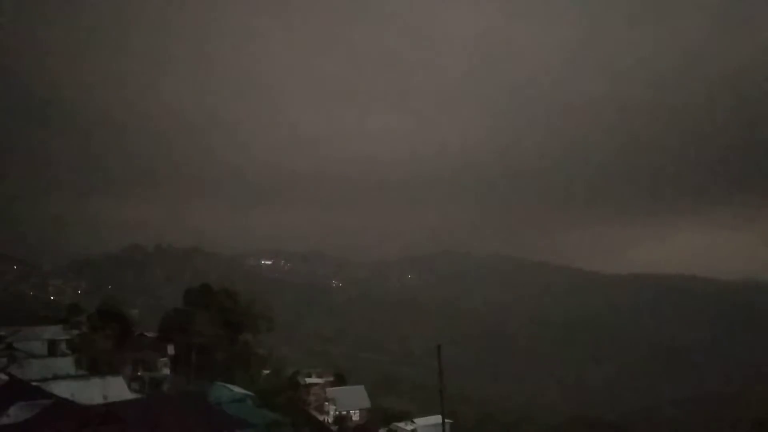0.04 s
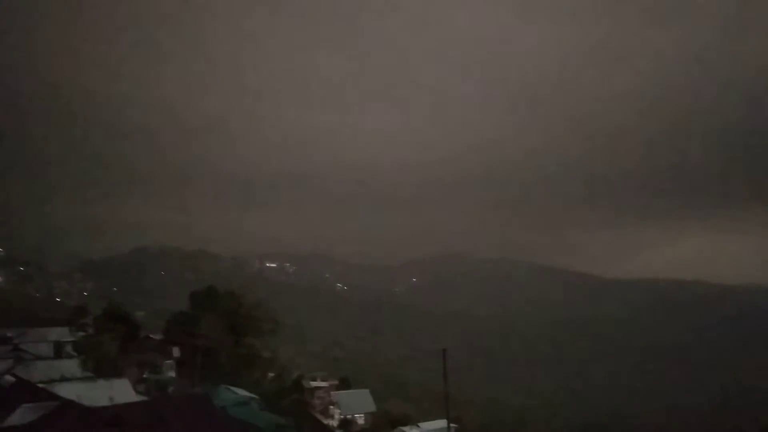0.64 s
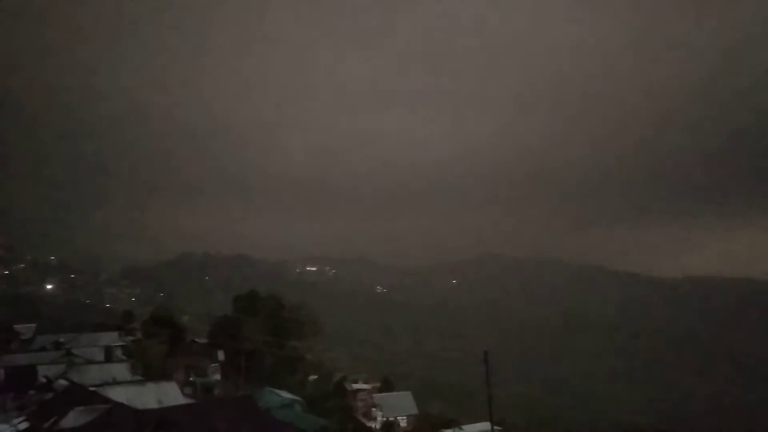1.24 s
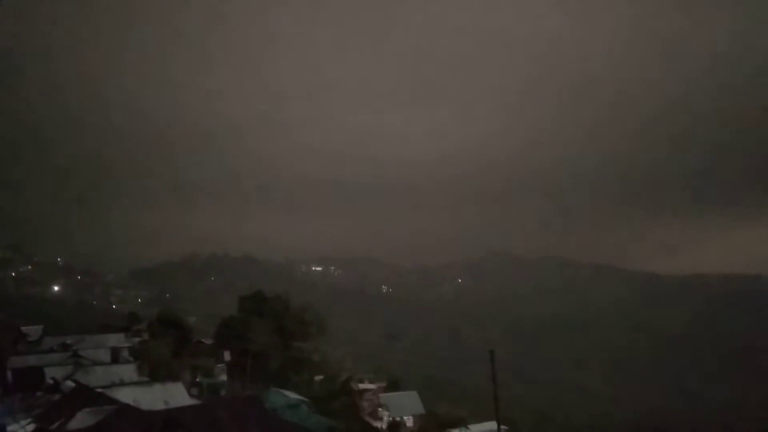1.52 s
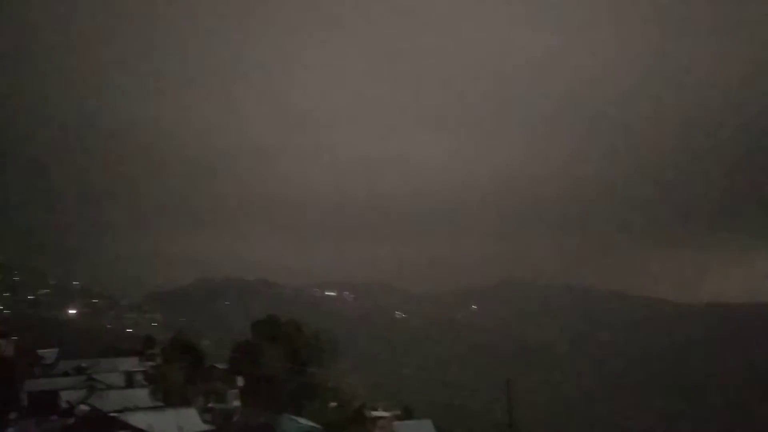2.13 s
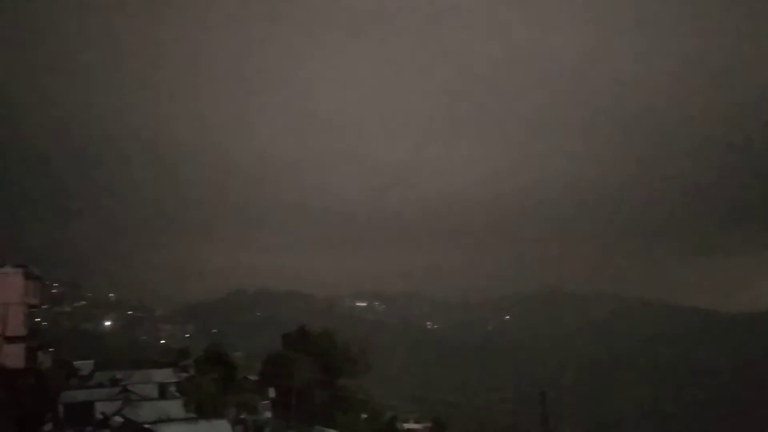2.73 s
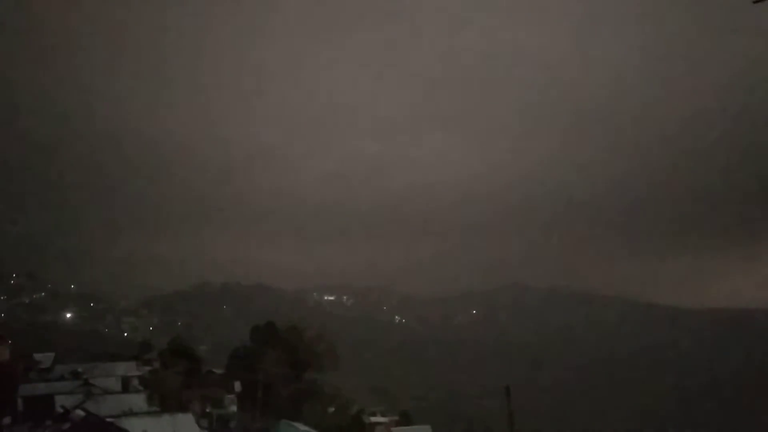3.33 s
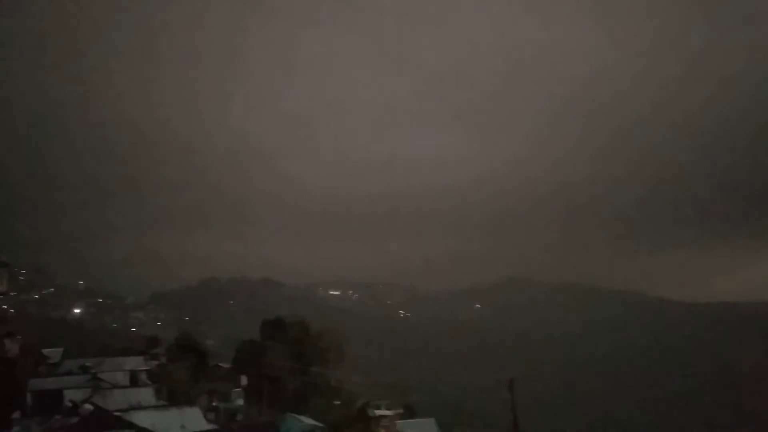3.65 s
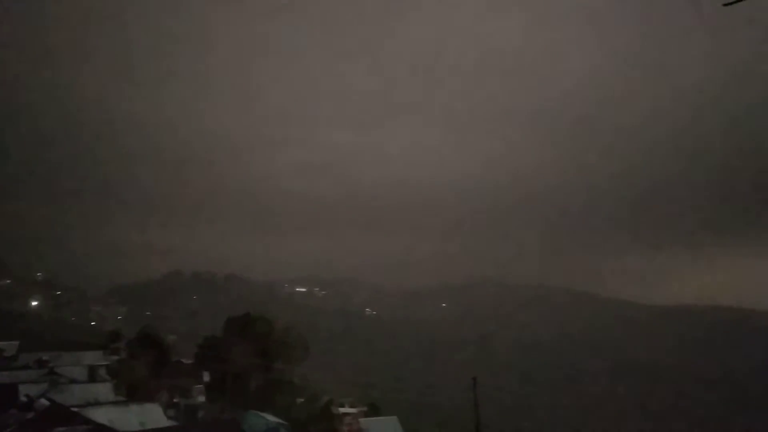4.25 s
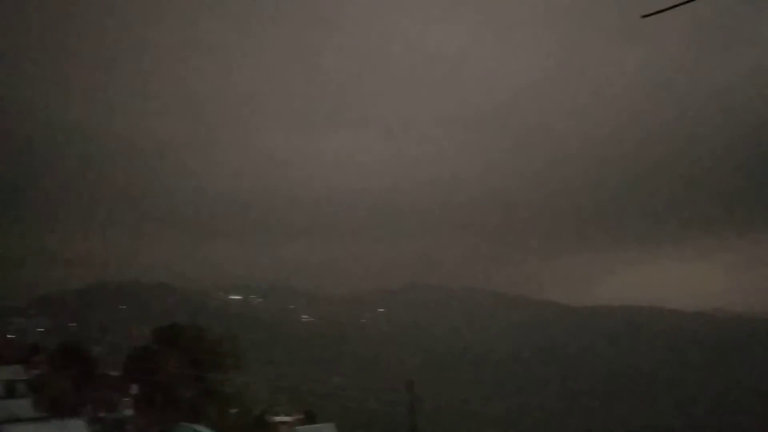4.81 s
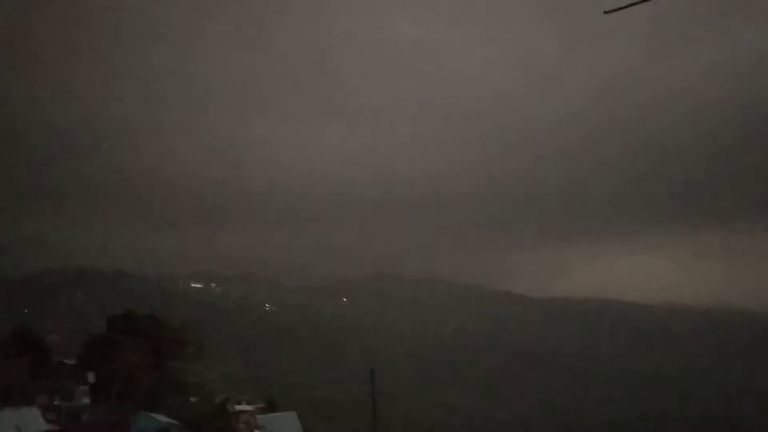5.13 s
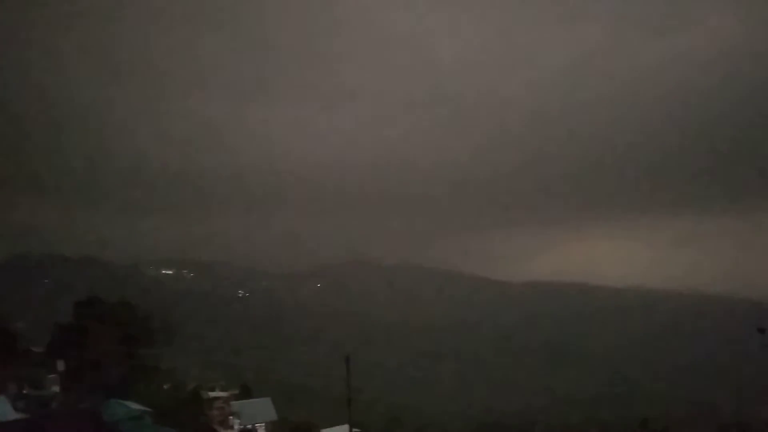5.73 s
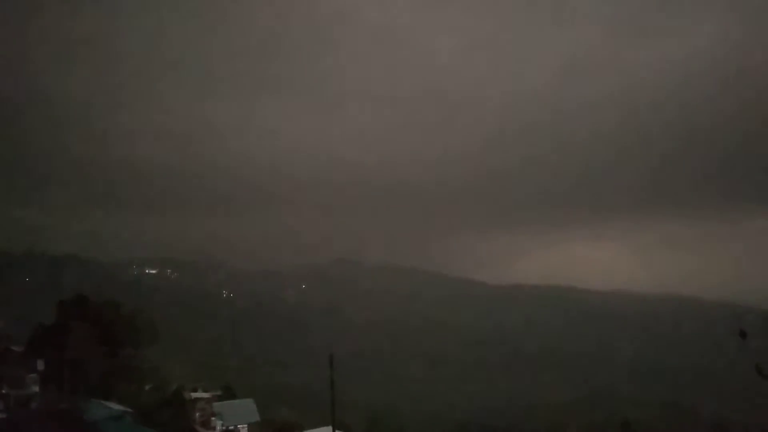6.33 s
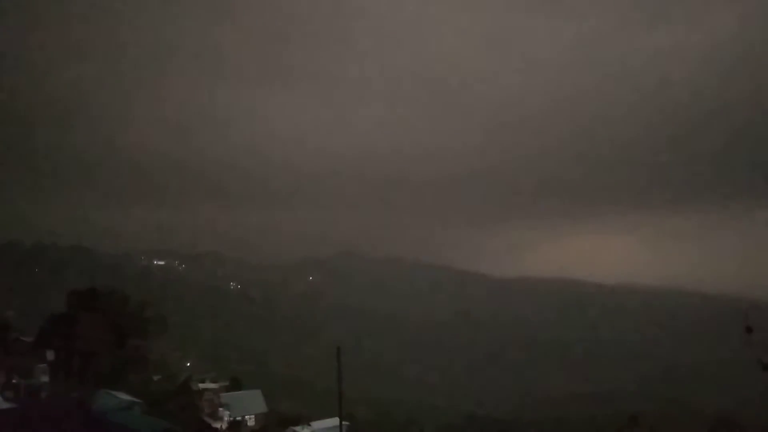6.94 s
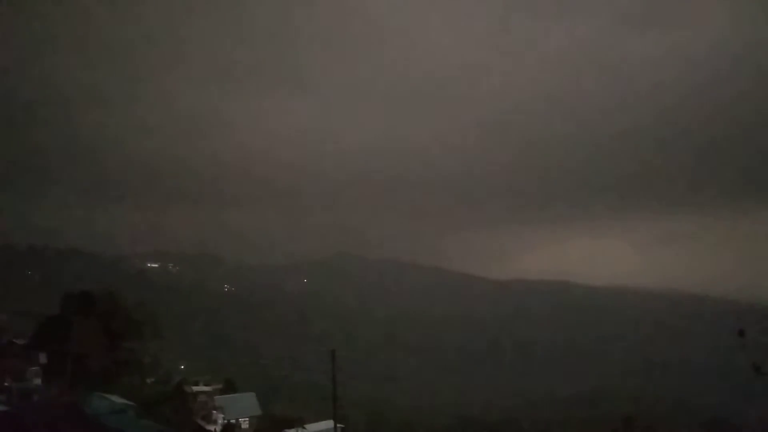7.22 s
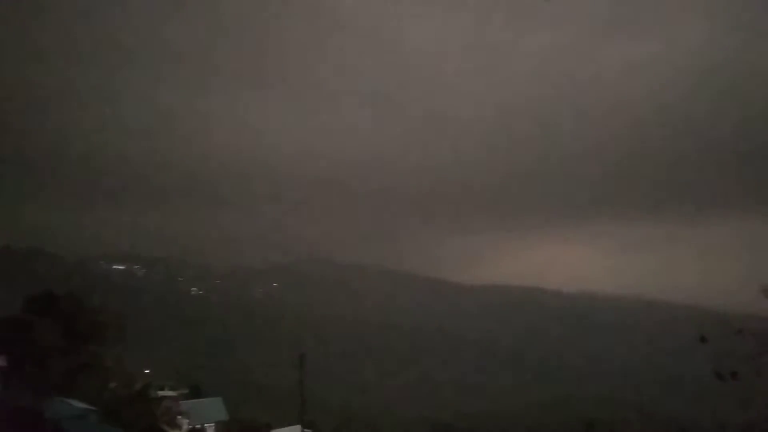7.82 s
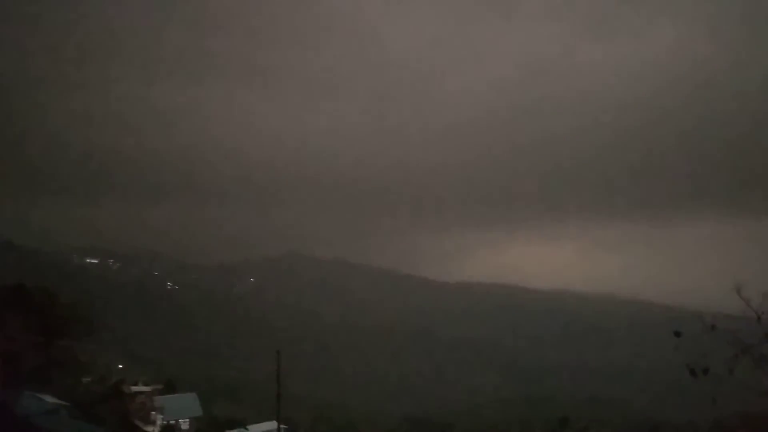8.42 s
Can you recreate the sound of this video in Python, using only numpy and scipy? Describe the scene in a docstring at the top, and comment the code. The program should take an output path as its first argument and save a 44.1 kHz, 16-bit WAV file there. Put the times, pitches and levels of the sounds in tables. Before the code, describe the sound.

Gusty wind buffets the microphone with low rumbles and thumps over a steady hiss of trees and grass.

```python
"""Storm wind on an open hillside at dusk, from a hand-held phone.
The input opens at 0.1 s and gusts at once drive eddies across the microphone port: the faster the air,
the louder and higher the buffeting. From 1.5 s it eases, leaving the hiss of trees and grass over a low,
far rush, with faint whistles and, from 3.6 s, a few small knocks nearby. A second run of hard gusts
thumps the port at 6 to 6.5 s; then the wind at the microphone drops while the far rush grows."""
import sys
import numpy as np
from scipy import signal
from scipy.fft import rfft, irfft, next_fast_len
from scipy.io import wavfile
from scipy.ndimage import uniform_filter1d, map_coordinates

SR = 44100
rng = np.random.default_rng(int(sys.argv[2]) if len(sys.argv) > 2 else 0)


def pcm_store(signal):
    """Save signal as 16-bit PCM."""
    levels = np.round(np.clip(np.atleast_2d(signal), -1, 1) * 32767)
    wavfile.write(sys.argv[1], SR, levels.astype(np.int16).T)


N = 373086
TIME = np.arange(N) / SR
COARSE_TIME = np.arange(0, N / SR, .001)

# Gusts striking the microphone: t/s at full strength, hold/s, level/dB
PORT_GUSTS = [(0.321, .025, -15.5), (0.419, .035, -13.5), (0.498, .11, -17), (0.656, 0.078, -13.5),
              (.89, 0.037, -16.5), (0.988, 0.045, -19), (1.299, 0.23, -19), (1.354, 0.063, -16),
              (1.69, .1, -27), (1.979, .01, -26), (2.101, 0.078, -21), (2.321, 0.16, -22),
              (2.571, 0.021, -26), (2.949, 0.083, -29.5), (3.499, 0.019, -30), (4.091, 0.076, -30.5),
              (4.44, 0.021, -30), (4.649, .06, -22.5), (4.925, .11, -24.5), (5.109, .08, -27.5),
              (5.553, .055, -22.5), (5.871, 0.12, -27), (6.025, 0.13, -16), (6.191, .105, -13.5),
              (6.351, .11, -14), (6.601, 0.021, -25.5), (6.819, 0.024, -19), (7.139, 0.039, -28),
              (8.098, 0.042, -27.5)]
# Breeze at the microphone between gusts: t/s, level/dB
PORT_BREEZE = [(.09, -54.5), (.24, -25.5), (1.2, -28), (1.88, -40), (2.4, -30), (2.8, -39), (3.4, -37),
               (3.85, -44), (4.25, -35), (4.83, -42), (5.25, -30.5), (5.4, -38), (6.75, -37.5),
               (7.15, -32.5), (7.8, -42), (8.46, -43.5)]
def wind_db(attack_s=.018, release_s=.022):
    """Each gust rises, holds and falls away on top of the breeze; their powers add."""
    power = undb(np.interp(COARSE_TIME, *np.transpose(PORT_BREEZE))) ** 2
    for s, hold_s, db in PORT_GUSTS:
        early = np.maximum(s - COARSE_TIME, 0)
        late = np.maximum(COARSE_TIME - s - hold_s, 0)
        power += (undb(db) * np.exp(-early / attack_s - late / release_s)) ** 2
    return np.interp(TIME, COARSE_TIME, 10 * np.log10(power))


# Pressure spectrum of eddies passing the port at relative speed 1: f/Hz, level/dB
EDDY_SPECTRUM = [(8, -15), (30, 1.5), (85, 1.5), (130, -2), (200, -8.5), (300, -12.5), (420, -22),
                 (600, -30.5), (850, -42), (1300, -61), (2500, -88)]
def buffeting(reference_db=-17, db_per_octave=18, surge_octaves=.14, race_octaves=.4, steadiness=.86):
    """A frozen field of eddies blows past the port; pressure and pitch both rise with the air speed."""
    gust_db = wind_db()
    speed = np.minimum(2 ** ((gust_db - reference_db) / db_per_octave), 1.1)
    # the flow surges and slackens within a gust, and races around each strong eddy
    near_eddy = sum(1 / (1 + ((COARSE_TIME - s) / .007) ** 2) for s, _, _ in STRONG_EDDIES)
    near_eddy = np.minimum(np.interp(TIME, COARSE_TIME, near_eddy), 1)
    speed *= 2 ** (surge_octaves * wander(55) + race_octaves * near_eddy)
    patchy_air = rng.standard_normal(N) * undb(2.5 * wander(120))
    field = unit_rms(tint(patchy_air, EDDY_SPECTRUM))
    pressure = map_coordinates(field, [np.cumsum(speed)], order=3, mode="wrap")
    # neighbouring stretches of air carry much the same audible energy
    audible = signal.sosfiltfilt(signal.butter(2, 35, "highpass", fs=SR, output="sos"), pressure)
    energy = uniform_filter1d(uniform_filter1d(audible ** 2, size=1800), size=900)
    levelling = energy ** (-steadiness / 2)
    return pressure * levelling / np.std(audible * levelling) * undb(gust_db - .8)


# Single strong eddies right on the port: t/s, peak level/dB before rounding, core half-width/s
STRONG_EDDIES = [(.33, -7, 0.0016), (.355, -12.5, .0005), (.431, -3, 0.0022), (.436, -1.5, 0.00089),
                 (.448, -8.5, .0008), (.658, -13, 0.00049), (.705, -7, 0.0012), (.729, 0.5, .001),
                 (.925, -7.5, 0.0011), (.987, -8, 0.001), (.996, -8, 0.00048), (1.37, -11, 0.00098),
                 (1.416, -4, .0019), (1.463, -11.5, .0011), (2.37, -10.5, .0012), (4.692, -21, .004),
                 (5.029, -14, 0.0013), (5.58, -8, 0.0033), (6.022, -0.5, 0.0014), (6.094, -6, 0.0023),
                 (6.189, -6, 0.0033), (6.348, -7.5, 0.0014), (6.406, -3, 0.0016), (6.416, 0, 0.0015),
                 (6.459, -10, 0.0014)]
def thumps(port_hz=1200, half_s=.02):
    """A vortex core gives one sharp pressure peak between two shallow troughs; the port rounds it."""
    out = np.zeros(N)
    t = np.arange(-half_s, half_s, 1 / SR)
    signs = rng.choice([-1, 1], len(STRONG_EDDIES))
    for (s, db, core_s), sign in zip(STRONG_EDDIES, signs):
        radius = t / core_s
        peak = (1 - radius ** 2) / (1 + radius ** 2) ** 2 * np.hanning(len(t))
        add(out, s - half_s, sign * undb(db) * peak)
    return signal.sosfiltfilt(signal.butter(4, port_hz, fs=SR, output="sos"), out)


# Trees and grass on the hillside: t/s, level/dB at 2-4 kHz, sizzle/dB, airy top/dB
FOLIAGE_LEVELS = [(.12, -49.5, 0, -4.5), (.3, -40, -1.5, -1.5), (.93, -40.5, -1, 1), (1.2, -38, -.5, -11),
                  (1.92, -39, 0, -7.5), (2.28, -36.5, -1.5, -13.5), (2.64, -37.5, .5, -8),
                  (2.98, -37, -3, -14), (3.38, -36.3, -2.5, -13.5), (3.74, -38, -1, -4.5),
                  (4.0, -37, -3, -7.5), (4.2, -38.5, -3.5, -2), (4.6, -37.5, -1.5, -9),
                  (5.4, -37.5, -3, -7), (5.6, -39, -4.5, -2.5), (7.05, -39.5, -4.5, -1.5),
                  (7.35, -40, -6.5, 2), (8.4, -39.5, -7.5, 0.5)]
# Their hiss as it reaches the phone: f/Hz, level/dB
FOLIAGE_SPECTRUM = [(100, -11.5), (400, -5.5), (900, -5), (1350, -6), (2400, -4), (3300, -2), (4200, -4.5),
                    (5500, -3), (7600, -9.5), (9300, -14), (10800, -15), (12000, -20.5), (15700, -25)]
# Resonances of the microphone duct: f/Hz, width/Hz, gain/dB
DUCT_RESONANCES = [(3395, 1110, 4), (5150, 1000, 2.5), (8920, 1100, 6.5)]
def foliage(grain_db=2.5, flutter_db=.53, shared_flutter_db=.43):
    """Countless leaf contacts merge to a hiss; each third octave flutters, and the top dims and opens."""
    level_db, sizzle_db, air_db = curves(FOLIAGE_LEVELS)
    size = next_fast_len(N)
    hz = np.fft.rfftfreq(size, 1 / SR)
    contacts = rng.standard_normal(N) * undb(grain_db * rng.standard_normal(N))
    duct_db = sum(db / (1 + (2 * (hz - f) / width) ** 2) for f, width, db in DUCT_RESONANCES)
    spectrum = rfft(contacts, size) * undb(colour_db(FOLIAGE_SPECTRUM, hz) + duct_db)
    body = irfft(spectrum * ((hz > 2000) & (hz < 4000)), size)
    spectrum /= body.std()
    octave = np.log2(np.clip(hz, 500, 16000))
    out = np.zeros(N)
    for centre_hz in 500 * 2 ** (np.arange(16) / 3):
        triangle = np.maximum(1 - 3 * abs(octave - np.log2(centre_hz)), 0)
        band = irfft(spectrum * triangle, size)[:N]
        # how strongly this band follows each of the two treble curves
        sizzle = np.interp(centre_hz, [3200, 4950, 6500, 7800], [0, .94, 1.43, .48])
        air = np.interp(centre_hz, [5100, 6270, 8000, 10000, 15000], [.15, .75, 1.23, 1.07, .42])
        treble_db = sizzle * (sizzle_db - sizzle_db.mean()) + air * (air_db - air_db.mean())
        out += band * undb(treble_db + flutter_db * wander(14))
    dip_db = np.interp(TIME, [.719, .752, .832], [0, -7, 0])  # the hiss dips briefly
    return out * undb(level_db + dip_db + shared_flutter_db * wander(25))


# Small knocks and ticks near the phone: t/s, level/dB, centre f/Hz, 60 dB decay/s
NEAR_KNOCKS = [(3.584, -34, 2845, 0.16), (3.978, -33, 3290, 0.14), (4.421, -24, 5530, 0.039),
               (4.681, -26, 4844, 0.062), (6.177, -24, 2590, 0.064), (6.859, -35.5, 2910, 0.53),
               (7.034, -31.5, 2963, 0.28), (7.699, -34, 2580, 0.21)]
def knocks(rise_s=.0015):
    """Each knock is a short burst that dies away around one broad resonance."""
    out = np.zeros(N)
    t = np.arange(SR // 2) / SR
    for s, db, hz, t60 in NEAR_KNOCKS:
        resonance = [(hz / 5, -40), (hz * .6, -7), (hz, 0), (hz * 1.5, -14), (hz * 4, -40)]
        burst = unit_rms(tint(rng.standard_normal(len(t)), resonance))
        envelope = (1 - np.exp(-t / rise_s)) * np.exp(-np.log(1000) * t / t60)
        add(out, s, burst * undb(db) * envelope)
    return out


# Wind far off in the valley: t/s, level/dB
RUSH_LEVELS = [(0, -57), (.3, -45.5), (3, -48), (4.3, -49), (5.5, -47), (7.5, -43.5), (8.46, -43)]
# Its rush as heard from the hillside: f/Hz, level/dB
RUSH_SPECTRUM = [(20, -11), (70, -10.5), (140, 0), (260, -1), (400, -5.5), (700, -10), (1200, -29),
                 (3000, -43)]
def valley_rush(swell_db=.94):
    """Far wind arrives as a dull, slowly swelling rush."""
    level_db, = curves(RUSH_LEVELS)
    rush = unit_rms(tint(rng.standard_normal(N), RUSH_SPECTRUM))
    return rush * undb(level_db - swell_db * wander(5))


# Faint whistles in the distance: middle t/s, length/s, f/Hz, glide/octaves per half length, level/dB
FAR_WHISTLES = [(1.587, 0.22, 1060, -0.068, -50), (1.879, .16, 1030, -.05, -48),
                (2.762, .15, 510, -0.014, -47.5), (2.9, .54, 1040, .05, -53.5),
                (3.346, 0.23, 760, 0.013, -49), (3.706, 0.098, 1090, 0.017, -43.5),
                (4.046, .5, 1140, 0.018, -51), (4.501, .38, 1065, 0.14, -46.5),
                (4.878, 0.32, 1017, -.06, -53), (5.466, .11, 1010, -.04, -46),
                (7.88, .15, 1150, -0.054, -51)]
def whistles(waver=.028, roughness=.6):
    """Narrow, unsteady tones swell out of the rush and sink back."""
    out = np.zeros(N)
    drift = wander(160) + wander(18) / 2
    flicker = wander(70)
    for s, length_s, hz, glide, db in FAR_WHISTLES:
        sweep = np.linspace(-1, 1, int(length_s * SR))
        here = int(s * SR) + np.arange(len(sweep)) - len(sweep) // 2
        pitch_hz = hz * 2 ** (glide * sweep) * (1 + waver * drift[here])
        tone = np.sqrt(2) * np.sin(2 * np.pi * np.cumsum(pitch_hz) / SR)
        swell = np.hanning(len(sweep)) * (1 + roughness * flicker[here])
        add(out, s - length_s / 2, undb(db) * swell * tone)
    return out


def undb(db):
    """Decibels to gain."""
    return 10 ** (np.asarray(db) / 20)


def unit_rms(x):
    """Scale to rms 1."""
    return x / np.sqrt(np.mean(x ** 2))


def curves(table):
    """Each column after t/s, interpolated to every sample."""
    s, *columns = np.transpose(table)
    return [np.interp(TIME, s, column) for column in columns]


def colour_db(points, hz):
    """Read (f/Hz, level/dB) points on a log-frequency axis."""
    f, db = np.transpose(points)
    return np.interp(np.log(hz + 1), np.log(f), db)


def tint(x, points):
    """Filter x to the colour of (f/Hz, level/dB) points."""
    hz = np.fft.rfftfreq(len(x), 1 / SR)
    return irfft(rfft(x) * undb(colour_db(points, hz)), len(x))


def wander(rate):
    """Random drift through rate new values a second, with a spread near 1."""
    steps = rng.standard_normal(2048)
    return 1.28 * np.interp(TIME * rate, np.arange(len(steps)), steps)


def add(out, s, x):
    """Mix x into out from time s."""
    start = max(int(s * SR), 0)
    out[start:start + len(x)] += x[:len(out) - start]


def scene():
    """The wind on the port and the hillside beyond it meet at one microphone."""
    return (buffeting() + thumps() + foliage() + valley_rush() + whistles() + knocks())[None]


def record(dry, open_s=.1, low_hz=7, ceiling=.92, top_hz=15700):
    """The phone's input opens after a moment, drops the deepest drift, rounds peaks and cuts the top."""
    opening = np.clip((TIME - open_s) / .012, .002, 1)
    sound = signal.sosfilt(signal.butter(1, low_hz, "highpass", fs=SR, output="sos"), dry * opening)
    rounded = sound / (1 + (sound / ceiling) ** 6) ** (1 / 6)
    return signal.sosfilt(signal.ellip(14, .1, 80, top_hz, fs=SR, output="sos"), rounded)


dry = scene()
out = record(dry)
pcm_store(out)
```